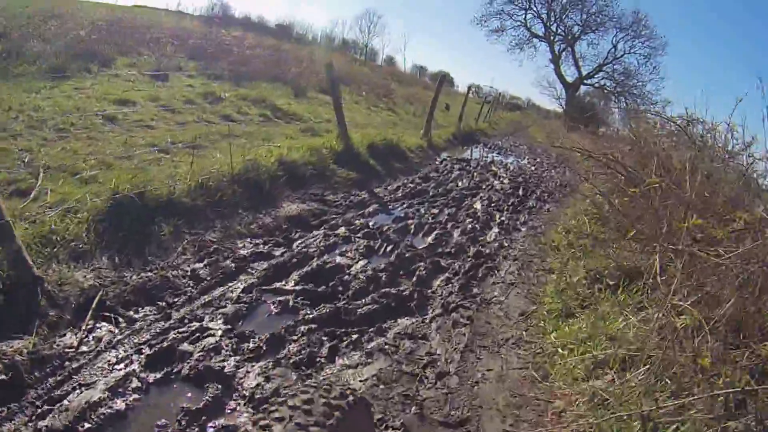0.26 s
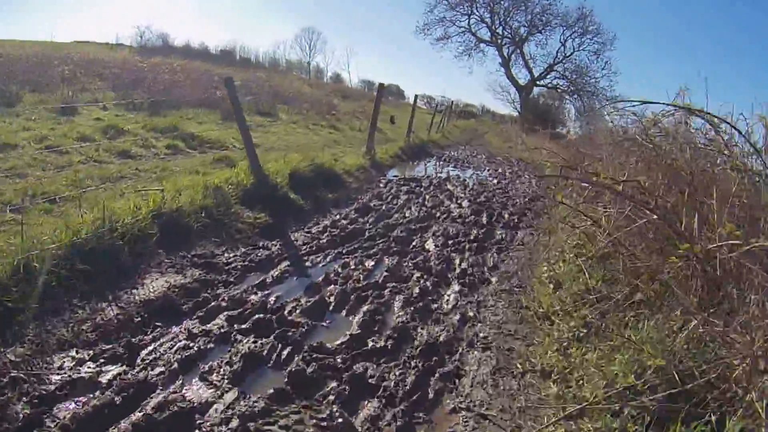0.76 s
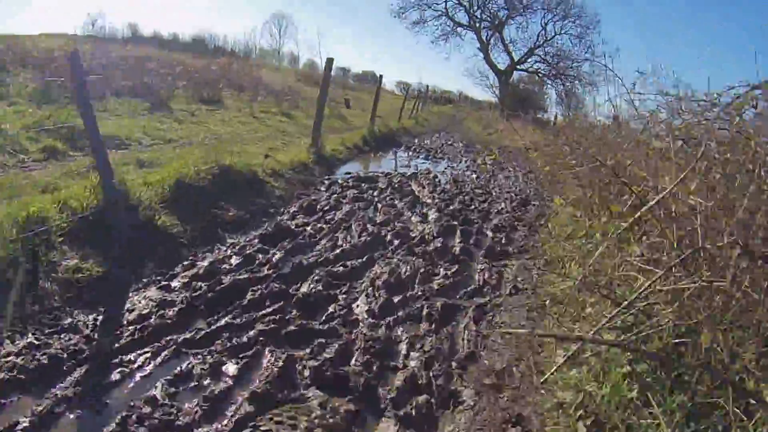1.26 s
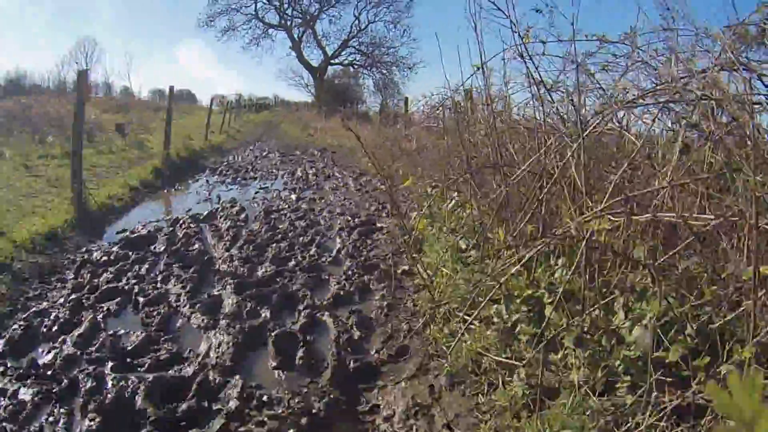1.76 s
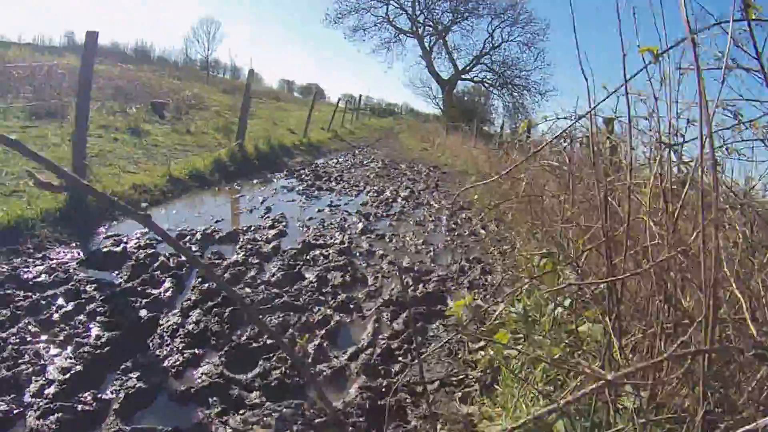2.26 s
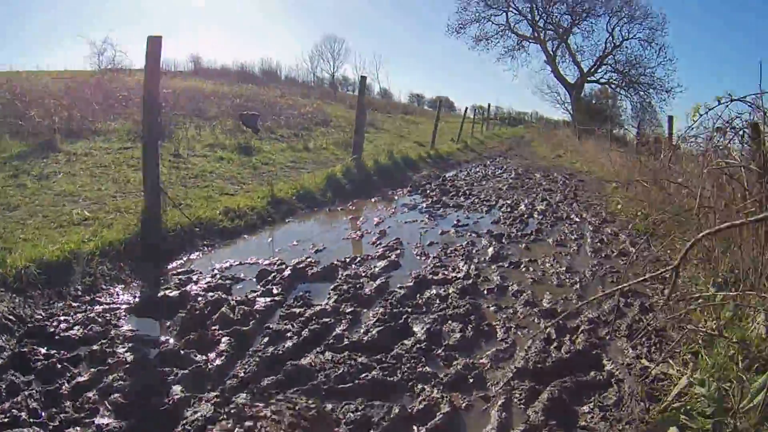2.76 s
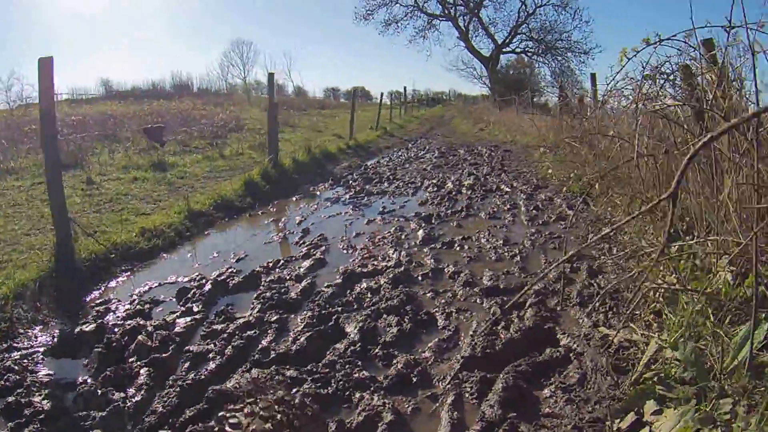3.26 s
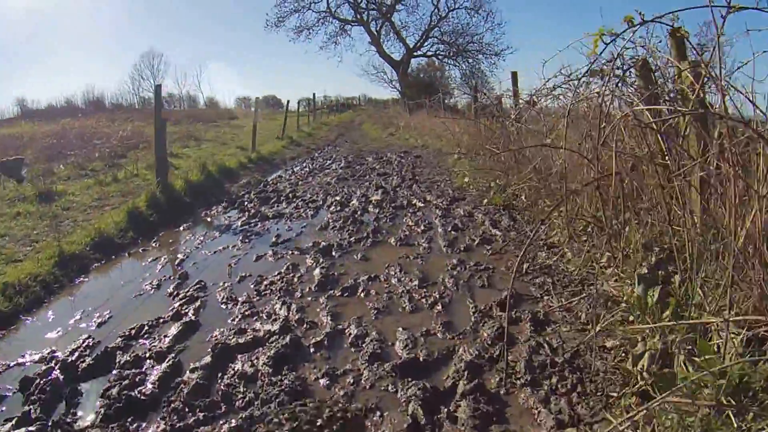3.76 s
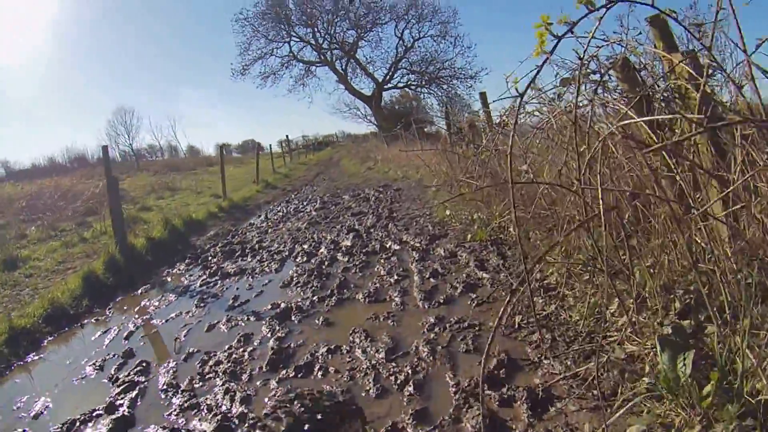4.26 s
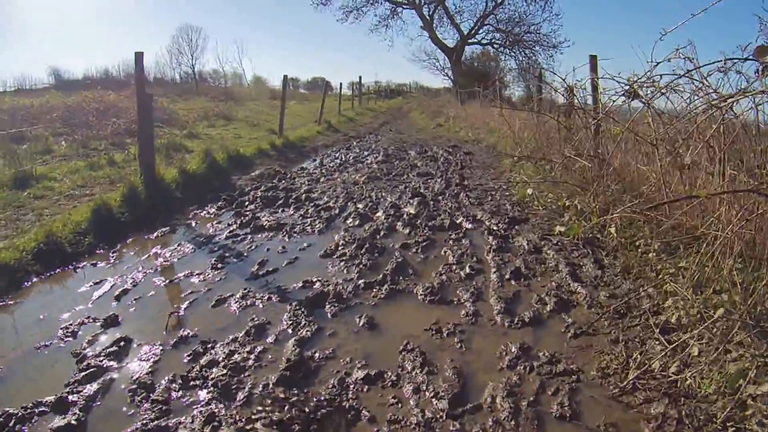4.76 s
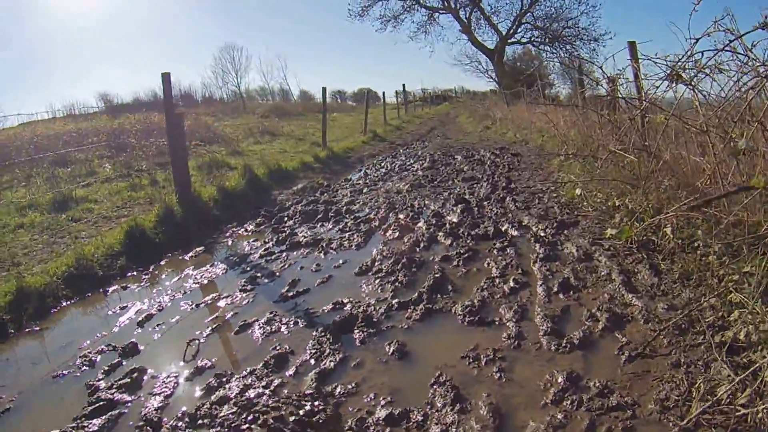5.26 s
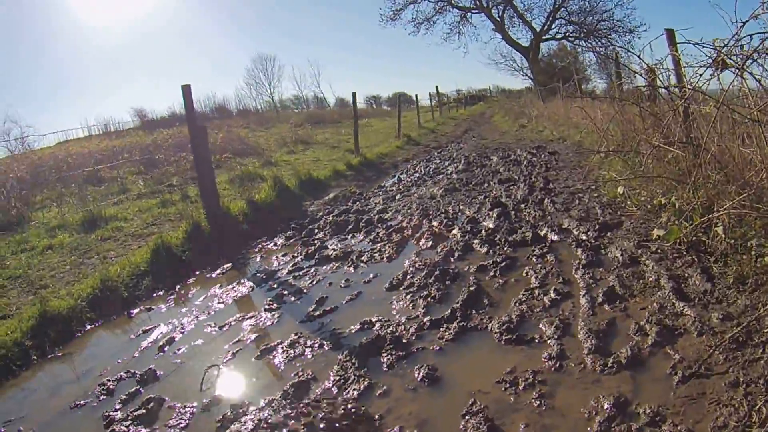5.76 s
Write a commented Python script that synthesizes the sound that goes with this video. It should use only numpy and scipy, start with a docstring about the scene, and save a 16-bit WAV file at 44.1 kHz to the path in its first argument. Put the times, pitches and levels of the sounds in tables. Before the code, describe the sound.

Close mono sound of a bicycle moving slowly through deep wet mud outdoors, with no echo. At 0 s low, lumpy wind puffs rumble on the microphone over soft rolling, a faint low drone and an airy whirr. Fine mud crackle is sparse, with small squelches, a bubbly plop near 0.35 s and light metal clinks at 0.2 and 0.8 s. Sharp snaps cluster at 1.2 s; from 1.5 to 2.4 s the crackle becomes dense, bright and sticky, with a hard spit at 1.8 s and another clink around 2.1 s. Wind eases. From 3.0 to 3.6 s brambles brush, slap and scrape the plastic housing: loud pops, hiss, rasp and thuds, strongest near 3.3 s. Wet crackle swells again around 3.8 s, then quietens into irregular dry ticks, small squelches and bubbles, with a faint clink near 5.7 s before ending at 6 s.

```python
"""A farm track in deep wet mud, heard from a camera in a plastic housing carried by a cyclist.
From the start air rumbles on the microphone, easing as the bike slows, over low rolling, a drone and a whirr.
The tyres crackle in clumps of tiny bursts over slush; dry snaps, squelches, ringing clinks and bubbles join in.
Halfway, brambles from the hedge brush, slap and scrape the housing: filtered noise, pops and ringing modes."""
import sys
import numpy as np
from scipy import signal
from scipy.fft import rfft, irfft, next_fast_len
from scipy.io import wavfile
from scipy.ndimage import map_coordinates

SR = 44100
rng = np.random.default_rng(int(sys.argv[2]) if len(sys.argv) > 2 else 0)


def wrap_up_sound(samples):
    """Save the sound to the file named by the first command line argument, as 16-bit audio."""
    columns = np.atleast_2d(samples).T
    # keep every value between -1 and 1, then stretch to whole-number steps
    tamed = np.clip(columns, -1, 1)
    steps = np.round(tamed * 32767).astype(np.int16)
    wavfile.write(sys.argv[1], SR, steps)


N = 265041  # length in samples, about 6 s

# how hard the tread tears at the mud: start_s, relative crackle level_db
BITE = [(0, -57.5), (.56, -63), (.77, -53.5), (.95, -61), (1.12, -59.5), (1.53, -37.5), (2.44, -43),
        (2.61, -56), (2.72, -46.5), (3.63, -49), (3.78, -36.5), (4.0, -46.5), (4.12, -58), (4.66, -47.5),
        (5.13, -60), (5.35, -57), (5.56, -60), (5.85, -50.5)]
# spectrum of fine wet crackle: frequency_hz, relative level_db
CRACKLE = [(1200, -27), (2500, -22.5), (4000, -13.5), (6300, -9.5), (9000, -8), (12000, -5.5),
           (13500, -1.5), (15600, 1)]
# spectrum of the duller slush: frequency_hz, relative level_db
SLUSH = [(250, -2.5), (450, 2.5), (750, 1), (1100, 0.5), (1700, 3), (2800, -0.5), (4000, -6), (7000, -13)]
USUAL_BITE_DB = -48  # value of BITE in ordinary rolling


def amp(db):
    """Decibels to amplitude gain."""
    return 10 ** (np.asarray(db) / 20)


def unit(x):
    """Scale to rms 1."""
    return x / np.sqrt(np.mean(x ** 2) + 1e-20)


def curves(rows):
    """One value per sample for each column after the time, joined by straight lines."""
    s, *columns = np.transpose(rows)
    return [np.interp(np.arange(N) / SR, s, column) for column in columns]


def wobble(rate):
    """A smooth random curve around zero, rate knots a second."""
    knots = rng.standard_normal(int(N * rate / SR) + 4)
    return map_coordinates(knots, [np.arange(N) * rate / SR])


def add(track, s, sound):
    """Mix a sound into a track at time s, cut off at the end of the track."""
    part = track[max(round(s * SR), 0):][:len(sound)]
    part += sound[:len(part)]


def colour(x, points, size=16384):
    """Minimum-phase filter through (Hz, dB) points that keeps the power of white noise."""
    hz, db = np.transpose(points)
    log_hz = np.log(np.fft.rfftfreq(size, 1 / SR) + 1)
    gain = unit(amp(np.interp(log_hz, np.log(hz), db, left=db[0] - 10)))
    # folding the cepstrum onto positive time makes the filter causal
    cepstrum = irfft(np.log(gain))
    cepstrum[1:size // 2] *= 2
    cepstrum[size // 2 + 1:] = 0
    impulse = irfft(np.exp(rfft(cepstrum)))
    return signal.fftconvolve(x, impulse)[:N]


def grains(rate, spread_db, life):
    """Noise bursts of very unequal size at random moments, rate a second, dying over life seconds; rms 1."""
    size = amp(spread_db * np.minimum(rng.exponential(size=N), 4))
    power = (rng.random(N) < rate / SR) * size ** 2
    envelope = np.sqrt(signal.lfilter([1], [1, -np.exp(-2 / (life * SR))], power))
    return unit(envelope * rng.standard_normal(N))


def pops(rate, hz, octaves, cycles, spread_db, size=256):
    """Tiny damped waves burst at random moments, rate a second, each at its own pitch; rms 1."""
    count = int(rate * N / SR)
    when, strength, pitch = rng.random((count, 3)).T
    f = np.clip(hz * 2 ** (octaves * (2 * pitch - 1)), 100, SR * .45)[:, None]
    turns = f * np.arange(size) / SR
    waves = np.sin(2 * np.pi * turns) * np.exp(-turns / cycles) * f / hz  # higher ones start stronger
    gain = amp(spread_db * np.minimum(-np.log(1 - strength), 3.5))[:, None]
    at = (when * N).astype(int)[:, None] + np.arange(size)
    return unit(np.bincount(at.ravel(), (gain * waves).ravel(), N + size)[:N])


def cracks(times, levels, t60):
    """A dying noise burst at each time, with the energy of white noise that starts at its level."""
    track, t = np.zeros(N), np.arange(SR // 20) / SR
    fade = amp(-60 * t / t60)
    for s, db in zip(times, levels):
        burst = fade * rng.standard_normal(len(t))
        add(track, s, amp(db) * burst * np.linalg.norm(fade) / np.linalg.norm(burst))
    return track


def strokes(times, lengths, levels, rise, release):
    """Envelope of rubbing strokes: each grips, holds and lets go; rise and release in seconds."""
    track, t = np.zeros(N), np.arange(SR // 3) / SR
    for s, length, db, up, down in np.broadcast(times, lengths, levels, rise, release):
        grip = 1 - np.exp(-t / up)
        let_go = np.exp(-np.maximum(t - length, 0) / down)
        add(track, s, amp(db) * grip * let_go)
    return track


def ring(hz, t60, attack, glide=0):
    """A damped sine whose pitch may rise as it dies, by the share glide."""
    t = np.arange(SR // 3) / SR
    phase = np.cumsum(hz * (1 + glide * np.minimum(t / t60, 1))) / SR
    return np.sin(2 * np.pi * phase) * amp(-60 * t / t60) * (1 - np.exp(-t / attack))


def narrow(hz, width_hz):
    """A fuzzy tone of rms 1 that follows a pitch curve: slow noise times a sine."""
    slopes = [(2, 0), (width_hz, 0), (4 * width_hz, -12), (16 * width_hz, -36), (64 * width_hz, -70)]
    drift = colour(rng.standard_normal(N), slopes)
    return unit(drift * np.sin(2 * np.pi * np.cumsum(hz * np.ones(N)) / SR))


def air():
    """Lumpy buffeting with a few puffs, the low rumble of rolling, a faint drone and a drifting whirr."""
    # air on the microphone eases as the bike slows: start_s, level_db before the lumps
    wind = [(0, -44.5), (.7, -40.5), (.87, -46), (1.25, -41.5), (1.85, -42), (2.15, -49), (2.65, -48),
            (3.9, -50), (4.6, -50), (5.2, -51.5), (6, -54)]
    # single puffs of air: peak_s, level_db
    gusts = [(.01, -29.5), (.14, -32.5), (1.03, -34), (3.28, -38), (4.94, -44.5)]
    # spectra of buffeting and of rolling: frequency_hz, relative level_db
    buffet_spectrum = [(12, 4.5), (28, 6), (45, -1), (70, 0.5), (95, 0.5), (130, -6), (200, -13),
                       (320, -27), (700, -52.5)]
    roll_spectrum = [(50, 0), (100, -7.5), (160, 1), (185, -3.5), (220, -4), (290, -8.5), (420, -15),
                     (650, -25.5), (1500, -51)]
    # a faint airy band: start_s, pitch_hz, rms level_db
    whirr_path = [(0, 1750, -62.5), (.6, 1620, -64.5), (1.4, 1620, -69.5), (2.6, 1950, -64),
                  (4.2, 2000, -70), (5.3, 2130, -69.5), (6, 2000, -69)]
    # a low drone: start_s, level_db
    hum = [(0, -57), (1.6, -64), (2.5, -56.5), (4.2, -56), (5.1, -64.5), (5.4, -54), (6, -54)]
    gust_width_s = 0.019  # standard deviation of a puff

    buffet_db, = curves(wind)
    t = np.arange(N) / SR
    puffs = sum(amp(db) * np.exp(-.5 * ((t - s) / gust_width_s) ** 2) for s, db in gusts)
    push = np.hypot(amp(buffet_db + 2.6 * wobble(13)), puffs)
    buffet = push * colour(rng.standard_normal(N), buffet_spectrum)
    roll = amp(-54 + 0.79 * wobble(5.1)) * colour(rng.standard_normal(N), roll_spectrum)

    whirr_hz, whirr_db = curves(whirr_path)
    whirr = amp(whirr_db) * narrow(whirr_hz, width_hz=95)
    hum_db, = curves(hum)
    wavering = np.sin(2 * np.pi * np.cumsum(213 + 2.55 * wobble(9)) / SR)
    drone = 0.11 * narrow(hz=211.8, width_hz=3.1) + wavering
    return buffet + roll + whirr + amp(hum_db) * drone


def tyres():
    """Wet mud tears from the tread in clumps of fine crackle and tiny droplets over a duller slush."""
    usual_slush_db, slush_follows = -59.5, 0.17  # relative level; dB gained for each dB of crackle
    crackle_db, = curves(BITE)
    slush_db = usual_slush_db + slush_follows * (crackle_db - USUAL_BITE_DB)
    clumps = amp(2.5 * wobble(70))
    films = pops(rate=1000, hz=7000, octaves=1.2, cycles=2.5, spread_db=4)
    droplets = pops(rate=260, hz=7000, octaves=1.1, cycles=14, spread_db=3, size=768)
    steady = amp(-2.5) * rng.standard_normal(N)
    fizz = steady + clumps * (amp(-4.5) * films + amp(-5) * droplets)
    crackle = colour(fizz * amp(crackle_db + 2.0), CRACKLE)
    wet_grains = grains(rate=170, spread_db=4.5, life=0.0035)
    wet = amp(0.5) * rng.standard_normal(N) + amp(-3.5) * wet_grains
    return crackle + colour(wet * amp(slush_db), SLUSH)


def small_ticks():
    """Lesser snaps at random, louder where the tread bites harder: start_s, level_db, low part relative_db."""
    per_s = 6.3
    usual_db, follows = -34.5, 1  # level at the usual bite; dB gained for each dB of bite
    chance = rng.random((int(per_s * N / SR), 3))
    s = chance[:, 0] * N / SR
    size, fullness = 2 * chance[:, 1:].T - 1
    bite_db = np.interp(s, *np.transpose(BITE)) - USUAL_BITE_DB
    level_db = usual_db + follows * bite_db - 1.5 * size
    low_db = -16.5 + 12 * fullness
    return np.transpose([s, level_db, low_db])


def ticks():
    """Single dry snaps of sticky mud and ticks of the bike: short noise bursts, some thin and some fuller."""
    # the loudest snaps and ticks: start_s, level_db, low part relative_db
    loud_ticks = [(.2645, -23.5, -20), (.406, -39, 7.5), (.5319, -27.5, -14), (.767, -25, -37),
                  (1.1693, -27, -11.5), (1.2284, -18, -23), (1.233, -20, -36), (1.268, -21, -30),
                  (1.494, -25.5, -8.5), (1.5772, -36, -30), (1.6615, -20.5, -9.5), (1.743, -20, -31),
                  (2.141, -18, -13.5), (2.3595, -33, -9), (2.391, -24.5, -5), (2.7245, -21.5, -21),
                  (2.7418, -22, -30), (2.8202, -16.5, -17), (2.933, -29.5, -1.5), (3.6207, -23, -30),
                  (3.6646, -33, -35), (3.9412, -21, -31), (3.9898, -22.5, -16), (4.2987, -32, -25),
                  (4.5894, -30, -6), (4.603, -21, -10), (4.7075, -21, -35), (4.84, -28, -34),
                  (4.8836, -22.5, -18), (4.9445, -26.5, -35), (4.9843, -29.5, -11), (5.033, -29, -20),
                  (5.2366, -27.5, -36), (5.428, -28, -26), (5.711, -23.5, -21), (5.7812, -23, -25)]
    # spectrum of the low part: frequency_hz, relative level_db
    snap_spectrum = [(700, -46), (1500, -16), (3000, -3), (4500, 0.5), (7500, -13)]

    s, db, low_db = np.vstack([loud_ticks, small_ticks()]).T
    bright = colour(cracks(s, db, t60=0.0057), CRACKLE)
    full = colour(cracks(s, db + low_db, t60=0.0081), snap_spectrum)
    return bright + amp(-1.5) * full


def squelches():
    """Pockets of mud give way with a spit of spray and a gurgle; the longer ones swell and fade more softly."""
    # mud squeezed from under the tread: start_s, length_s, spray level_db, slush level_db
    squeezes = [(0.198, 0.081, -45, -66.5), (.323, 0.012, -36.5, -57), (0.344, 0.012, -38.5, -58.5),
                (0.747, 0.037, -44.5, -79), (1.018, 0.059, -44, -71), (1.161, 0.025, -31, -70),
                (1.193, 0.086, -41, -73), (1.361, 0.016, -36, -75), (1.527, 0.023, -29, -59.5),
                (1.811, 0.0037, -14, -61), (1.982, 0.016, -30, -62), (2.098, 0.018, -41, -56),
                (2.307, 0.0012, -46, -36.5), (2.359, 0.0038, -25, -45.5), (2.364, 0.013, -40, -47.5),
                (2.383, 0.054, -45, -57.5), (2.72, 0.013, -38, -54.5), (2.818, 0.066, -39, -59),
                (3.765, 0.095, -43.5, -58.5), (3.825, 0.0055, -45, -51.5), (3.979, 0.036, -37.5, -54.5),
                (4.06, 0.025, -51, -58.5), (4.338, .037, -54, -62.5), (4.495, 0.036, -46, -62.5),
                (4.595, 0.02, -38, -61), (4.922, 0.01, -42, -57), (5.777, .01, -35, -81)]
    s, length, spray_db, slush_db = np.transpose(squeezes)

    def squeeze(levels):
        """Envelope whose rise and release are shares of each squelch's length."""
        return strokes(s, length, levels, 0.063 * length, 0.27 * length)

    gurgle = pops(rate=1500, hz=1400, octaves=1.7, cycles=1.5, spread_db=1.5)
    spit = squeeze(spray_db) * grains(rate=2200, spread_db=2.5, life=.0005)
    return colour(spit, CRACKLE) + colour(squeeze(slush_db) * gurgle, SLUSH)


def clinks():
    """Loose metal parts of the bike knock: one clear ring, weaker damped modes and a jangle of noise."""
    # knocks: start_s, relative level_db, clearest ring pitch_hz, its t60_s
    knocks = [(0.212, -44, 2450, 0.14), (0.222, -39, 3780, 0.13), (0.828, -43, 2490, 0.14),
              (0.833, -53, 1230, 0.4), (0.848, -48, 6000, 0.052), (2.095, -43, 5300, 0.087),
              (2.142, -41.5, 3550, .12), (5.659, -48.5, 3820, 0.032)]
    # weaker modes: pitch_hz, relative level_db, t60_s
    metal = [(850, -12, 0.18), (1000, -15.5, .25), (2395, -12, 0.15), (3700, -13, 0.15), (4270, -9, 0.093),
             (5630, -9, 0.12), (6100, -19, 0.1), (6660, -20, 0.11), (7300, -20, .15)]
    # spectrum of the chatter of loose parts: frequency_hz, relative level_db
    jangle_spectrum = [(700, -9), (2000, -18), (3200, -12), (4900, 4), (6400, -5), (9000, -7), (15000, -7)]

    track = np.zeros(N)
    for s, db, clear_hz, clear_t60 in knocks:
        modes = 0
        for hz, level, t60 in metal:
            # each knock excites and tunes the modes a little differently
            gain = amp(level + rng.normal(0, 1.3))
            modes = modes + gain * ring(hz * (1 + rng.normal(0, 0.0173)), t60, attack=.0003)
        clear = ring(clear_hz, clear_t60, attack=0.00026)
        add(track, s, amp(db) * (amp(0.5) * clear + amp(-3.5) * modes))
    s, db = np.transpose(knocks)[:2]
    jangle = colour(cracks(s, db, t60=0.059), jangle_spectrum)
    return track + amp(3.5) * jangle


def bubbles():
    """Each air pocket rings briefly, rising in pitch as it opens; its soft wall makes the ring waver."""
    # air pockets that burst: start_s, pitch_hz, level_db before the waver, t60_s
    pockets = [(0.349, 740, -32.5, 0.069), (0.353, 490, -30, 0.03), (0.347, 1330, -39, .025),
               (0.533, 2660, -35.5, 0.026), (1.229, 2230, -30, 0.023), (1.265, 3140, -30.5, 0.017),
               (2.304, 2740, -21.5, 0.011), (3.872, 990, -30.5, 0.026), (3.896, 1040, -34.5, 0.027),
               (3.961, 3980, -28.5, 0.032), (4.533, 638, -39, 0.044), (4.604, 684, -36.5, 0.02),
               (4.603, 3330, -35, 0.033), (4.690, 2790, -37.5, 0.022), (4.936, 606, -44.5, 0.069)]
    track = np.zeros(N)
    for s, hz, db, t60 in pockets:
        add(track, s, amp(db) * ring(hz, t60, attack=.0015, glide=.22))
    return track * (.8 + .5 * wobble(600))


def brambles():
    """Leaves brush, thorns snap and stems stick and slip on the housing; it hisses, rasps, thuds and rings."""
    # leaves press on the mount: start_s, thud level_db
    brush = [(2.8, -56), (2.86, -51), (2.96, -53), (3.0, -42), (3.11, -37.5), (3.2, -37), (3.225, -61),
             (3.25, -31), (3.35, -55.5), (3.41, -38), (3.48, -45), (3.62, -67)]
    # thorns hit the housing: start_s, level_db, rasp relative_db
    thorns = [(3.0064, -8, -4.5), (3.019, -28.5, 10.5), (3.048, -28, 4), (3.0565, -21, 4.5),
              (3.107, -10.5, -27), (3.1485, -8, -16), (3.2013, -25, -12), (3.138, -22, -14),
              (3.2407, -7.5, -17), (3.2482, -17, -8), (3.2596, -10, -35), (3.2809, 2, -18),
              (3.3432, -28, -2), (3.4014, -4, -21), (3.4054, -8.5, -14), (3.429, -19, -24),
              (3.4369, -7.5, -40), (3.4865, -18, -25), (3.495, -14.5, -10.5), (3.5602, -7.5, -9.5),
              (3.5909, -21, -30)]
    # stems drag over the housing: start_s, length_s, hiss level_db, rasp level_db
    scrapes = [(3.005, .0035, -43, -23.5), (3.009, 0.018, -40, -41.5), (3.04, 0.0054, -25, -40),
               (3.065, 0.038, -57, -40), (3.1, 0.017, -26, -34), (3.12, 0.031, -37.5, -46),
               (3.142, 0.036, -21.5, -40), (3.238, 0.0024, -38, -22), (3.245, 0.0057, -31, -31),
               (3.262, 0.019, -23.5, -38), (3.296, 0.029, -27.5, -35), (3.353, 0.0099, -33, -40),
               (3.374, 0.045, -30.5, -43.5), (3.434, 0.0097, -26, -46), (3.484, 0.0053, -16, -36.5),
               (3.563, 0.024, -37, -50)]
    # stiff stems flex against the mount and sound briefly: start_s, pitch_hz, level_db, t60_s
    flexes = [(3.011, 203, -18.5, 0.02), (3.046, 1470, -21.5, 0.02), (3.089, 370, -30, 0.13),
              (3.100, 500, -9.5, 0.016), (3.311, 2200, -24, 0.022)]
    # the housing rings: pitch_hz, relative level_db, t60_s
    shell_modes = [(1570, -11, 0.02), (7700, -11, 0.018), (12600, -9.5, 0.058), (13900, -16, 0.017)]
    # spectra of the housing's hiss, rasp and thud: frequency_hz, relative level_db
    hiss_spectrum = [(1800, -33), (3000, -20), (5500, -5.5), (7300, -6.5), (7900, 2), (8500, -2),
                     (9300, -4), (11200, -1), (12000, 2), (13500, 4), (15800, 4)]
    rasp_spectrum = [(500, -18), (800, -12), (1100, -3), (1450, -2.5), (1750, 0), (2100, -3.5),
                     (2900, -3.5), (4500, -1.5)]
    thud_spectrum = [(40, -48), (90, -2), (160, -1), (230, -0.5), (295, -1), (350, -6), (400, -9),
                     (450, -8.5), (620, -6.5), (730, -7), (850, -9.5), (1200, -23)]

    hit, db, rasp_rel = np.transpose(thorns)
    s, length, hiss_db, rasp_db = np.transpose(scrapes)
    # silent before and after the brush
    leaves = amp(np.interp(np.arange(N) / SR, *np.transpose(brush), left=-np.inf, right=-np.inf))
    slips = unit(amp(2.2 * wobble(450)))

    def rub(levels, leaf_db):
        """Stick-slip envelope of stems and leaves, their powers summed."""
        stems = strokes(s, length, levels, rise=.001, release=.002)
        return slips * np.hypot(stems, amp(leaf_db) * leaves)

    fine = pops(rate=6000, hz=7000, octaves=1.3, cycles=2.5, spread_db=3, size=96)
    coarse = pops(rate=1500, hz=1700, octaves=1.1, cycles=3, spread_db=2)
    # leaf hiss and rasp are set relative to the leaf thud
    hiss = rub(hiss_db, leaf_db=-5) * fine + amp(3) * cracks(hit, db, t60=.004)
    rasp = rub(rasp_db, leaf_db=-11) * coarse + cracks(hit, db + rasp_rel + 3.5, t60=0.0075)
    thud = rub(rasp_db - 1.5, leaf_db=0) * rng.standard_normal(N)

    rings = np.zeros(N)
    for when, blow_db in zip(hit, db):
        add(thud, when, [amp(blow_db - 2)])  # one short push on the mount
        modes = 0
        for hz, level, t60 in shell_modes:
            modes = modes + amp(level + rng.normal(0, 4.6)) * ring(hz, t60, attack=.0004)
        add(rings, when, amp(blow_db - 22) * modes)
    for when, hz, flex_db, t60 in flexes:
        add(rings, when, amp(flex_db) * ring(hz, t60, attack=0.00077))
    shell = colour(hiss, hiss_spectrum) + colour(rasp, rasp_spectrum) + colour(thud, thud_spectrum)
    return rings + shell


def scene():
    """Everything is close to the microphone and in the open, with no echo; one channel."""
    mix = air() + tyres() + ticks() + squelches() + clinks() + bubbles() + brambles()
    return mix[None]


def record(dry):
    """The camera rounds off the highest peaks and keeps nothing above its band limit."""
    ceiling, top_hz = .33, 15850  # ceiling as a share of full scale
    rounded = dry / (1 + np.abs(dry / ceiling) ** 4) ** (1 / 4)
    size = next_fast_len(N + SR // 2)
    in_band = np.fft.rfftfreq(size, 1 / SR) < top_hz
    return irfft(rfft(rounded, size) * in_band, size)[..., :N]


dry = scene()
out = record(dry)
wrap_up_sound(out)
```